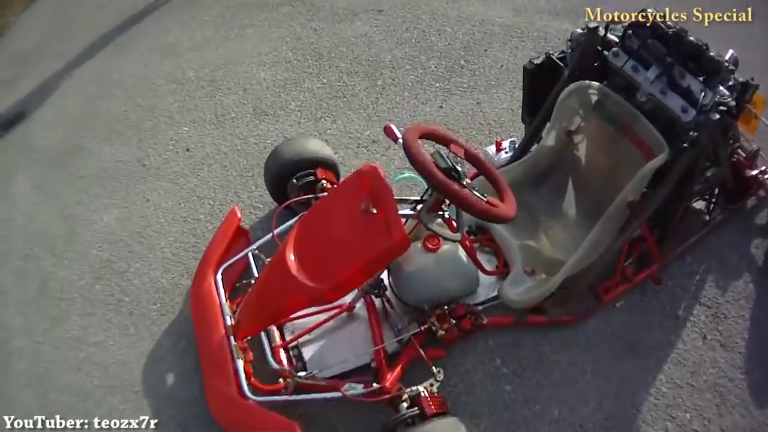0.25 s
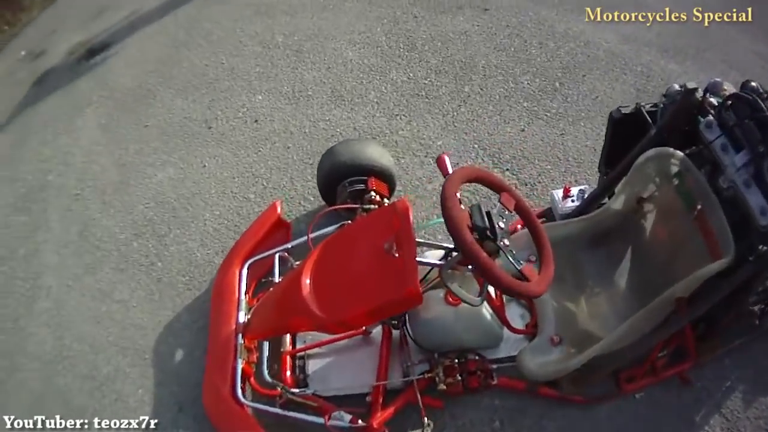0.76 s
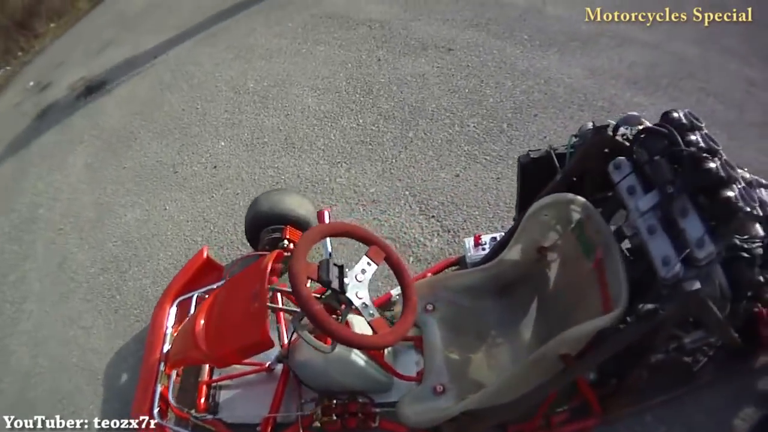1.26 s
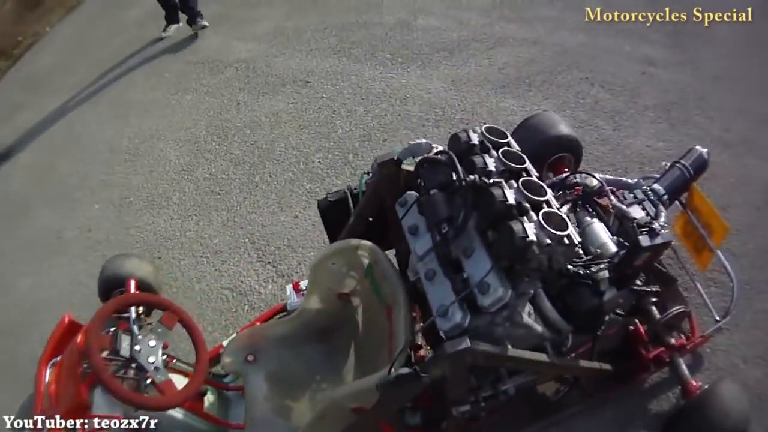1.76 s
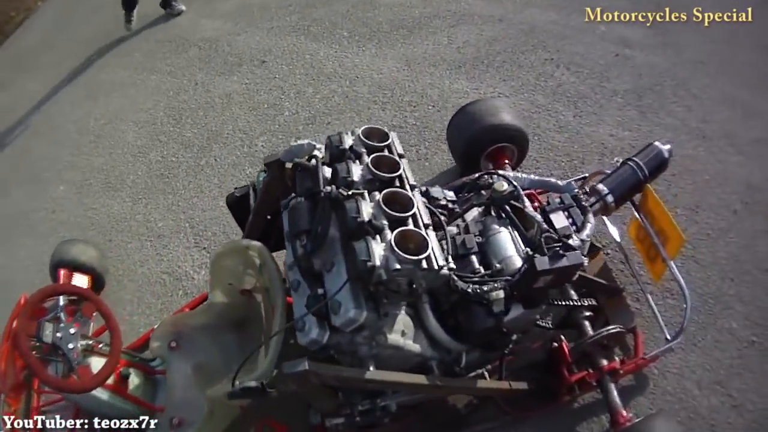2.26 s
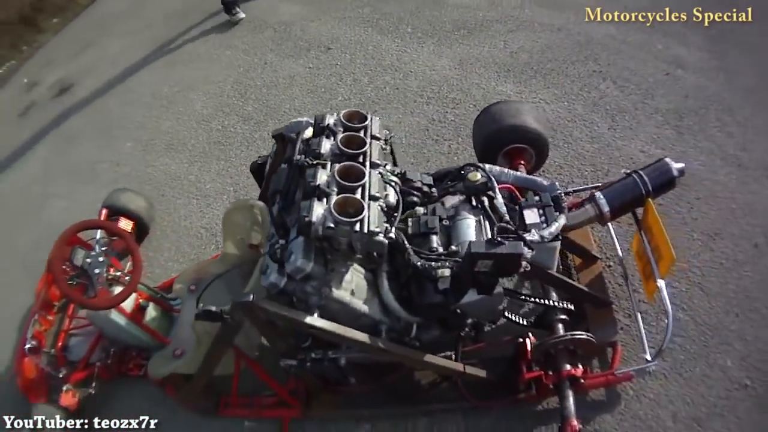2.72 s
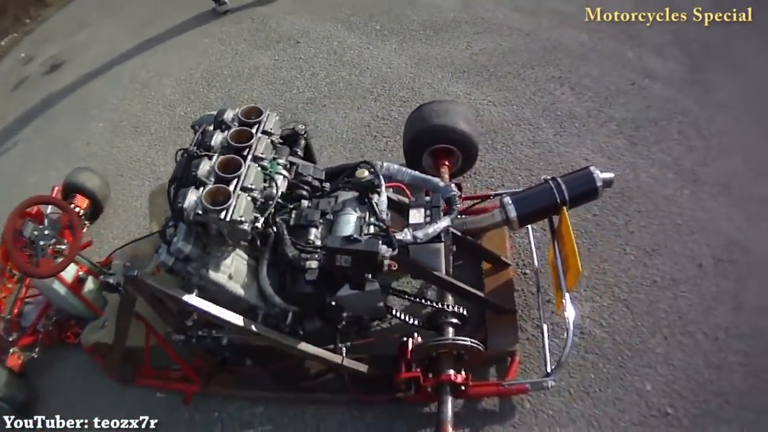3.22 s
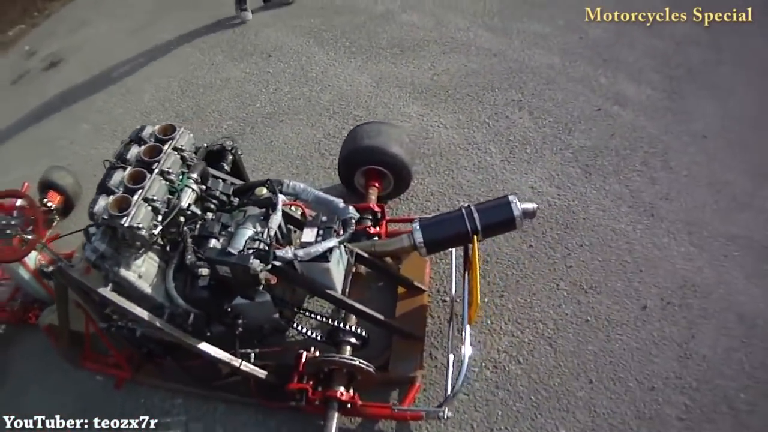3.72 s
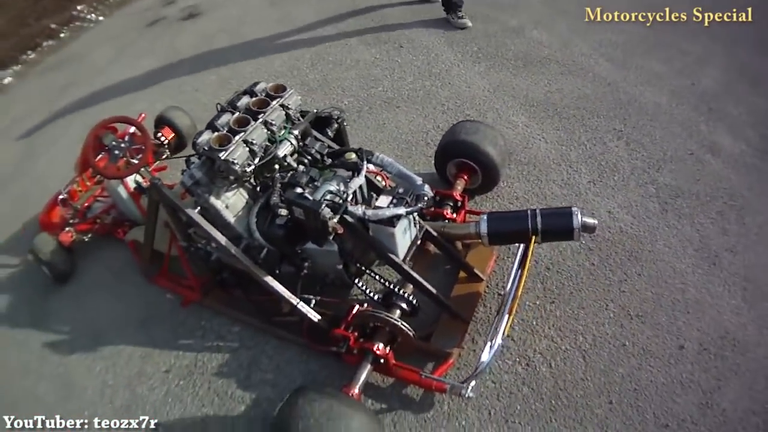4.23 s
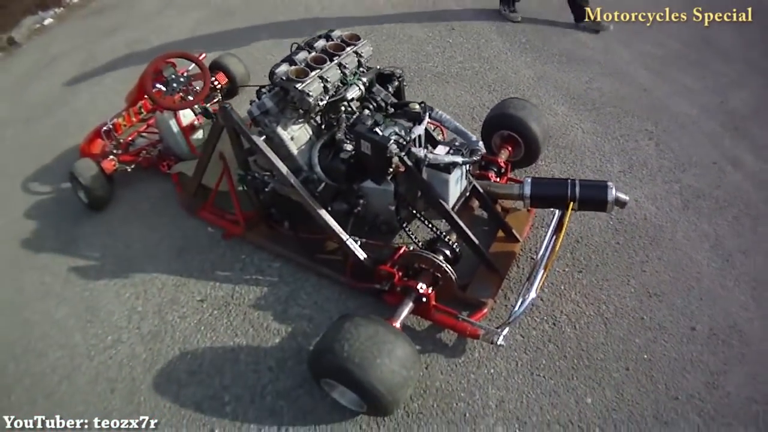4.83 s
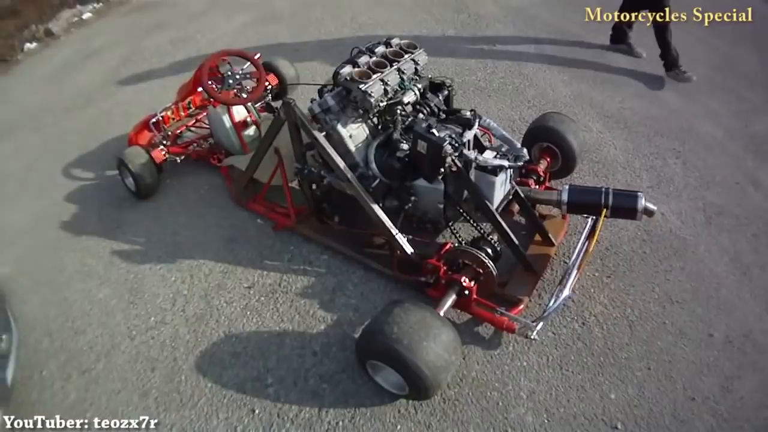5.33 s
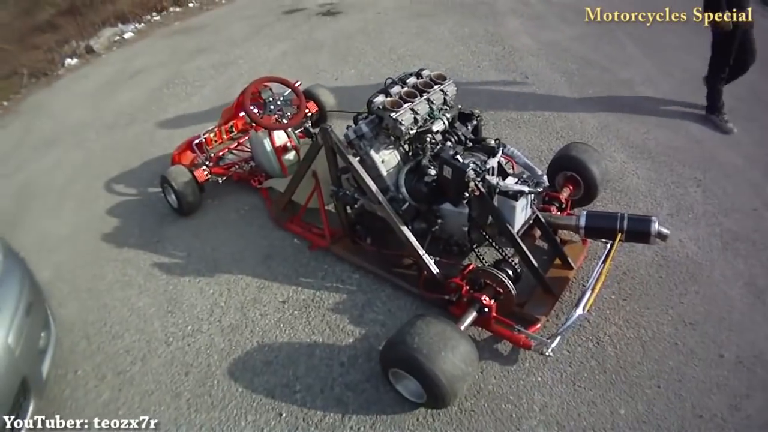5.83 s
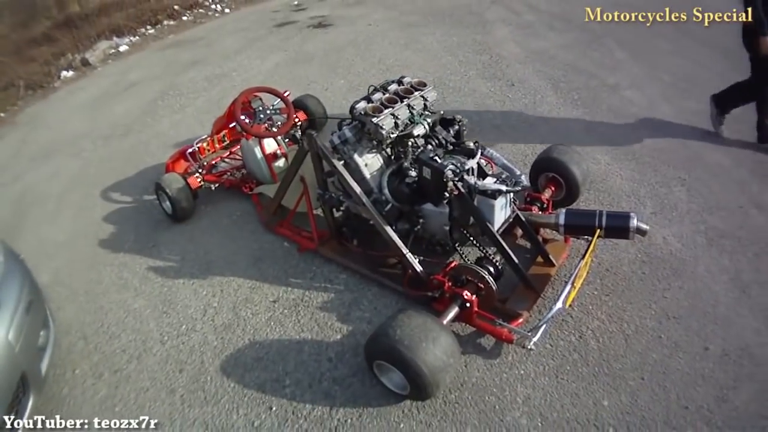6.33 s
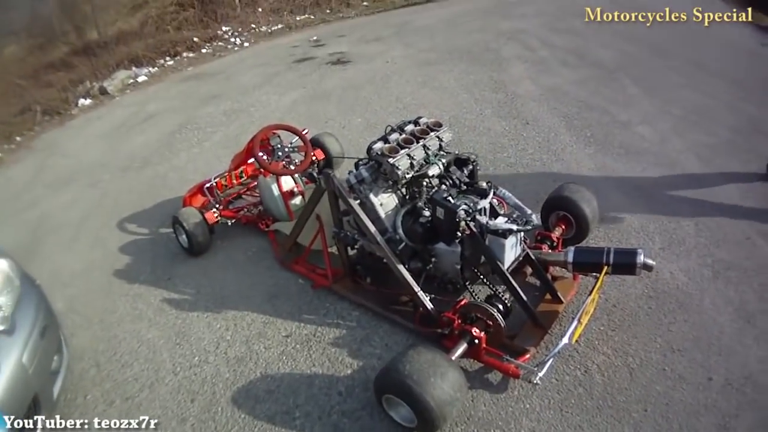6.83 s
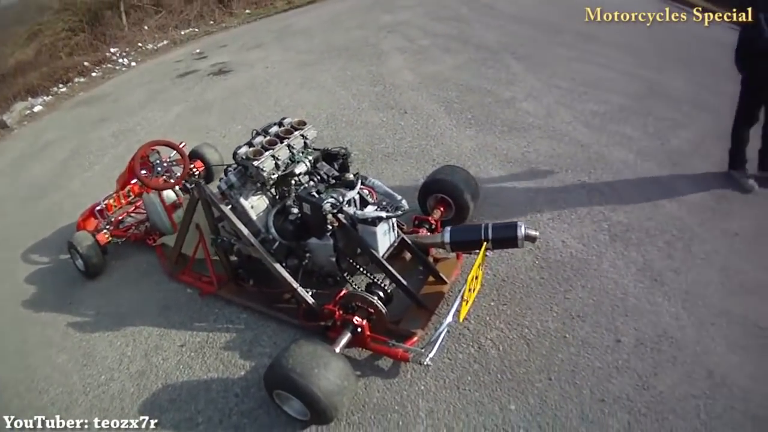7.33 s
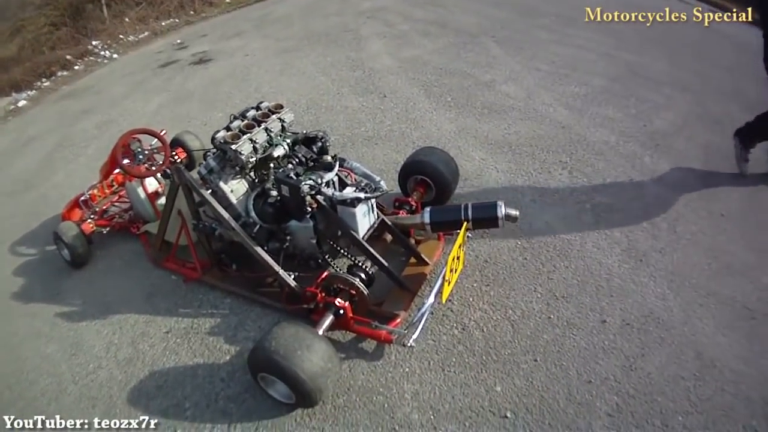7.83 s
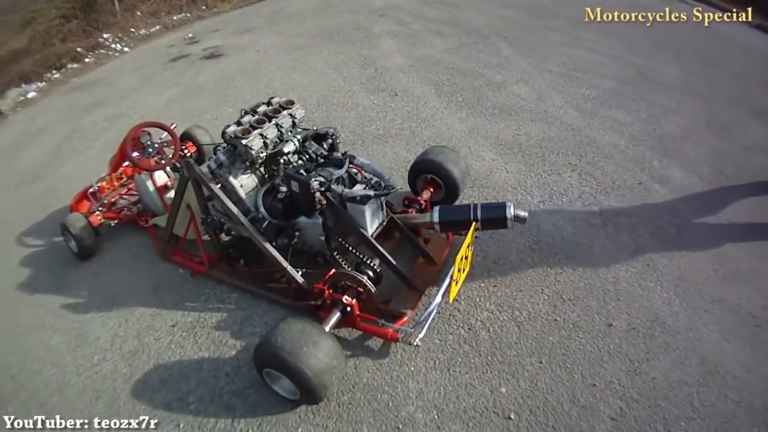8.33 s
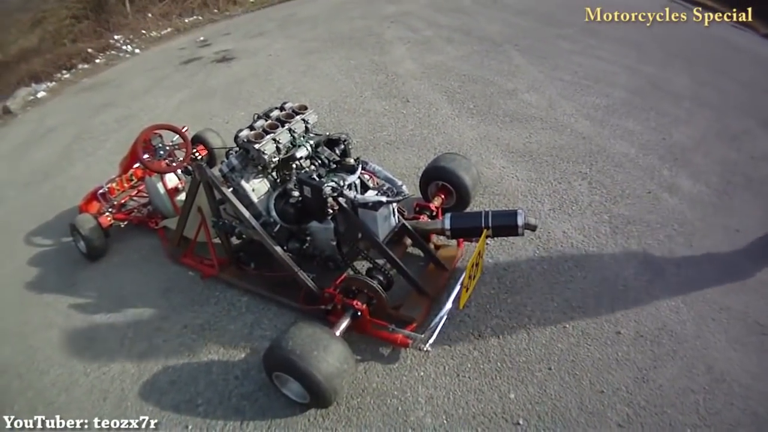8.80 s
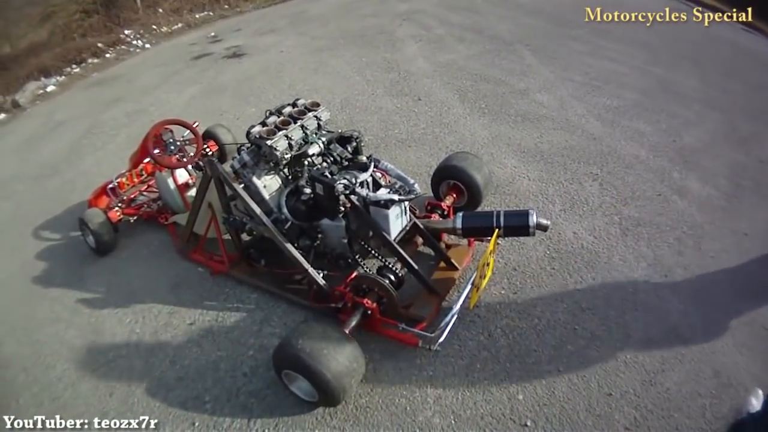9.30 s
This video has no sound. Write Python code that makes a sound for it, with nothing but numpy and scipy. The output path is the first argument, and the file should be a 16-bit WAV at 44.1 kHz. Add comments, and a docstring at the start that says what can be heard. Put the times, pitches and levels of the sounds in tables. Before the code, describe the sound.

A four-cylinder motorcycle engine in a go-kart idles outdoors, slightly uneven, with busy metallic clatter over a low exhaust throb.

```python
"""Idling go-kart, walk-round.

A four-cylinder motorcycle engine in a go-kart idles on open asphalt while the listener walks round it.
Each firing sends a pulse and a rush of gas through the silencer; one cylinder often fires weakly.
Chain, gears and valves clatter and ring the casings; the running gear squeals briefly.
The yard echoes faintly. A few knocks, shoe scuffs and one puff of wind pass over a steady outdoor wash."""
import sys
import numpy as np
from scipy import signal
from scipy.fft import rfft, irfft
from scipy.io import wavfile

SR = 44100
rng = np.random.default_rng(int(sys.argv[2]) if len(sys.argv) > 2 else 0)


def inscribe(sig):
    """Save sig as 16-bit PCM at rate SR to the path in sys.argv[1].

    A 1-D sig is mono; a 2-D sig holds one channel per row.
    Samples are clipped to [-1, 1] before scaling.
    """
    pcm = np.round(np.clip(np.atleast_2d(sig).T, -1, 1) * 32767)
    wavfile.write(sys.argv[1], SR, pcm.astype(np.int16))


N = 421596
TIME = np.arange(N) / SR
IDLE_HZ = 55.4  # nominal firing rate


def gain(db):
    """Decibels to amplitude."""
    return 10 ** (np.asarray(db) / 20)


def unit_rms(x):
    """Scale to rms 1."""
    return x / np.sqrt(np.mean(x ** 2) + 1e-20)


def curve(rows, column=1):
    """One column of a (t/s, values) table at every sample."""
    rows = np.array(rows)
    return np.interp(TIME, rows[:, 0], rows[:, column])


def drift(rate_hz):
    """Slow random drift, rms 1."""
    hz = np.fft.rfftfreq(N, 1 / SR)
    return unit_rms(irfft(rfft(rng.standard_normal(N)) * np.exp(-(hz / rate_hz) ** 2) * (hz > 0), N))


def colour(x, outline, size=8192):
    """Minimum-phase filter with an (f/Hz, gain/dB) outline."""
    hz, db = np.transpose(outline)
    bins_hz = abs(np.fft.fftfreq(size, 1 / SR))
    log_gain = np.log(gain(np.interp(np.log(bins_hz + 1), np.log(hz + 1), db)))
    impulse = np.fft.ifft(np.exp(np.conj(signal.hilbert(log_gain)))).real
    return signal.oaconvolve(x, impulse[:size // 2])[:N]


def resonate(x, hz, width_hz):
    """Two unity-gain resonators in series, at a steady or moving frequency."""
    carrier = np.exp(2j * np.pi * np.cumsum(hz * np.ones(N)) / SR)
    pole = np.exp(-np.pi * width_hz / SR)
    for _ in range(2):
        x = 2 * (carrier * signal.lfilter([1 - pole], [1, -pole], x / carrier)).real
    return x


def rattle(envelope, modes):
    """Tiny hits under an envelope ring a set of modes; rms 1."""
    hits = envelope * rng.standard_normal(N)
    return unit_rms(sum(gain(db) * resonate(hits, hz, width_hz) for hz, width_hz, db in modes))


def strokes(count, rise, decay, spread_db):
    """Envelope with a stroke of random size at each whole count; rise and decay in counts."""
    age = count % 1
    index = np.floor(count - np.floor(count.min())).astype(int)
    size = gain(spread_db * rng.uniform(-1, 1, index.max() + 1))
    return size[index] * (1 - np.exp(-age / rise)) * np.exp(-age / decay)


def swells(rows):
    """Short swells of band noise: linear rise, exponential decay."""
    octave = np.log2(np.fft.rfftfreq(N, 1 / SR) + 1)
    spectrum = rfft(rng.standard_normal(N))
    out = np.zeros(N)
    for start_s, db, hz, width_oct, rise_s, decay_s in rows:
        band = unit_rms(irfft(spectrum * np.exp(-.5 * ((octave - np.log2(hz)) / width_oct) ** 2), N))
        age_s = np.maximum(TIME - start_s, 0)
        envelope = np.minimum(age_s / rise_s, 1) * np.exp(-np.maximum(age_s - rise_s, 0) / decay_s)
        out += gain(db) * band * envelope
    return out


def walk(sounds, route):
    """Crossfade between standpoints along a (t/s, standpoint index) route."""
    place = curve(route)
    return sum(np.maximum(1 - abs(place - k), 0) * x for k, x in enumerate(sounds))


# Outdoor spectrum: f/Hz, relative level/dB
AIR_SPECTRUM = [(15, -13), (40, -47.5), (100, -27), (300, 3.5), (600, 11), (900, -6.5), (1300, -5),
                (1700, -10.5), (3000, -51), (14000, -23)]


def air(level_db=-53):
    """Steady outdoor wash."""
    return gain(level_db) * unit_rms(colour(rng.standard_normal(N), AIR_SPECTRUM))


# Wind puff, knocks, scuffs: t/s, top rms/dB, f/Hz, width/oct, rise/s, decay/s
BUMPS = [(.36, -34.5, 44.9, 2.2, 0.022, 0.022), (2.129, -41, 1175, .5, .001, .005),
         (2.498, -45, 1189, 0.62, .001, .004), (2.644, -37, 1147, .5, 0.0011, 0.0051),
         (4.88, -50, 1300, .6, 0.017, 0.047), (6.272, -56, 9260, .4, .002, 0.015),
         (7.01, -45.5, 1910, 1, 0.023, 0.074), (7.10, -31, 416, 0.31, 0.033, 0.029)]


def bumps():
    """A low puff of wind, sharp knocks and softer shoe scuffs."""
    return swells(BUMPS)


# Echo paths: first delay/s, last delay/s, gain/dB
ECHO_PATHS = [(0.0232, .0135, -22), (0.033, .029, -16.5), (.052, .0555, -34)]
# Echo trim, rising as the listener steps back: t/s, gain/dB
ECHO_TRIM = [(3.5, -5.5), (6.5, 2.5)]


def yard_echoes(x):
    """Reflections off a parked car and the yard's edge; the paths change as the listener walks."""
    echoes = sum(gain(db) * np.interp(TIME - np.linspace(first_s, last_s, N), TIME, x)
                 for first_s, last_s, db in ECHO_PATHS)
    return gain(curve(ECHO_TRIM)) * echoes


# Squeals: t/s, top rms/dB, f/Hz, width/oct, rise/s, decay/s
SQUEALS = [(1.33, -42, 3750, .03, 0.12, 0.077), (1.5, -42.5, 4070, .035, .06, .03),
           (3.58, -45, 4205, 0.016, 0.066, 0.073), (3.92, -40, 4030, .09, .08, .04)]


def squeals():
    """The running gear squeals briefly in narrow bands near 4 kHz."""
    return swells(SQUEALS)


# Hunting idle speed: t/s, firing rate/Hz
FIRING_RATE = [(0.0, 53.39), (0.511, 55.111), (0.837, 52.843), (1.06, 55.9), (2.062, 55.545),
               (2.189, 54.137), (3.14, 55.466), (3.208, 57.009), (3.644, 55.465), (4.338, 56.795),
               (4.452, 55.745), (5.148, 56.353), (5.49, 53.281), (5.846, 55.685), (6.256, 53.632),
               (7.796, 55.829), (7.898, 58.273), (8.32, 55.034), (8.452, 58.117), (8.848, 53.103),
               (9.046, 56.655), (9.56, 54.753)]


def crank():
    """Running count of firings, whole at each opening of an exhaust valve."""
    return np.cumsum(curve(FIRING_RATE)) / SR - .016


# Metal parts: f at idle/Hz, width/Hz, level/dB, speed tracking/0-1
RING_MODES = [(2413, 41, -5.5, .1), (2885, 45, -5.5, 1), (3560, 51, -7.5, .85)]
# Their carry to the listener: t/s, low/dB, middle/dB, high/dB
RING_LEVELS = [(0, -55, -51, -57), (.65, -60, -44.5, -39.5), (1.3, -50, -48, -40), (1.75, -42, -47, -46.5),
               (3.05, -43.5, -43.5, -36.5), (3.6, -55, -45.5, -53), (6.6, -49.5, -52.5, -41.5),
               (7.7, -58, -55, -52), (9.56, -57, -54, -54)]


def ringing(flicker_db=2.0, flicker_hz=5, flutter=0.0048, flutter_hz=7):
    """Meshing gears keep three parts ringing unevenly; the upper two follow the speed closely."""
    speed = curve(FIRING_RATE) / IDLE_HZ * (1 + flutter * drift(flutter_hz))
    out = np.zeros(N)
    for column, (hz, width_hz, db, tracking) in enumerate(RING_MODES, 1):
        tone = resonate(rng.standard_normal(N), hz * speed ** tracking, width_hz)
        tone *= gain(flicker_db * drift(flicker_hz))
        out += gain(curve(RING_LEVELS, column) + db) * unit_rms(tone)
    return out


# Machinery, loudest over the engine: t/s, gears and clatter and valves/dB, crankcase knock/dB
MACHINE_LEVELS = [(0, -42, -53.5), (2.5, -38.5, -54), (3.8, -39.5, -55), (7, -42.6, -60),
                  (9.56, -42.5, -63)]
# Tooth-mesh tones: f/firing rate, relative level/dB
MESH_ORDERS = [(18.5, -13), (20.5, -19), (39.5, -5), (43.25, -1.5), (52, -1.5), (56, -2.5), (64.5, 0),
               (68, -2), (72.5, -1.5), (76.5, -2.5)]


def gear_whine(level_db=-9, width_hz=22):
    """Meshing teeth give fuzzy whines locked to the engine speed."""
    firing_hz = curve(FIRING_RATE)
    whine = sum(gain(db) * unit_rms(resonate(rng.standard_normal(N), order * firing_hz, width_hz))
                for order, db in MESH_ORDERS)
    return gain(curve(MACHINE_LEVELS) + level_db) * unit_rms(whine)


# Two take-ups and a lighter rebound: phase/cycle, level/dB
BACKLASH_BLOWS = [(.9, 0), (.11, 0), (.48, -5)]


def backlash(firings, rise_cycles, decay_cycles, spread_db):
    """Envelope of the blows from the drive's slack in each cycle of four firings."""
    blows = [gain(db) * strokes(firings / 4 - phase, rise_cycles, decay_cycles, spread_db)
             for phase, db in BACKLASH_BLOWS]
    return np.sqrt(sum(blow ** 2 for blow in blows))


# Chain slap: t/s, level/dB
CHAIN_LEVEL = [(0, -58), (1.4, -54), (2, -49.5), (3.8, -47.5), (5, -50.5), (6.5, -51.5), (7.4, -53.5),
               (9.5, -56.5)]
# Chain tunnel: f/Hz, width/Hz, relative level/dB
TUNNEL_MODES = [(2180, 450, 0.5), (2330, 390, 1), (6320, 610, -11.5)]


def chain_slap(firings):
    """The cam chain slaps its guide at each backlash blow and rings the tunnel."""
    envelope = backlash(firings, rise_cycles=.04, decay_cycles=0.083, spread_db=5)
    return gain(curve(CHAIN_LEVEL)) * rattle(envelope, TUNNEL_MODES)


# Crankcase: f/Hz, width/Hz, relative level/dB
CRANKCASE_MODES = [(770, 220, -7), (1040, 35, 3), (1147, 63, 4), (1196, 165, 1)]


def crankcase_knock(firings, trim_db=-3):
    """Slack in the drive rattles the crankcase."""
    envelope = backlash(firings, rise_cycles=0.023, decay_cycles=0.17, spread_db=3)
    return gain(curve(MACHINE_LEVELS, column=2) + trim_db) * rattle(envelope, CRANKCASE_MODES)


# Casing response at the nose, overhead, at the side and further back: f/Hz, gain/dB
CASING_NOSE = [(900, -18.5), (1300, -13), (1900, -16.5), (2330, -19), (2600, -12), (3160, -9), (3650, -2.5),
               (4450, -15.5), (5200, -21), (6000, -20), (7000, -25), (8100, -23), (10000, -29.5),
               (14500, -35)]
CASING_OVER = [(760, -28.5), (1300, -11), (1500, -15.5), (2330, -0.5), (2610, -11), (2830, -0.5),
               (3130, -5.5), (3600, 4.5), (5340, -13.5), (6530, -12), (7300, -20), (8160, -14.5),
               (9980, -27), (11500, -19.5), (14500, -38)]
CASING_SIDE = [(760, -42.5), (1300, -16.5), (1760, -11), (2240, -0.5), (2610, -7.5), (2860, -3),
               (3530, 3.5), (3830, -3), (4360, -0.5), (4880, -19), (6340, -10.5), (7300, -18),
               (9780, -28.5), (13200, -24.5), (14500, -40)]
CASING_BACK = [(900, -34.5), (1650, -15.5), (2300, -0.5), (2680, -7.5), (3000, -3), (4000, 0.5),
               (5300, -20.5), (6650, -10), (7600, -26.5), (8300, -21), (9550, -23.5), (10300, -28.5),
               (11500, -22), (14500, -44)]


def casings(hits):
    """The casings colour small hits differently in each direction."""
    responses = (CASING_NOSE, CASING_OVER, CASING_SIDE, CASING_BACK)
    heard = [unit_rms(colour(hits, response)) for response in responses]
    return walk(heard, route=[(1.2, 0.33), (1.8, 1.47), (4, 1.34), (4.7, 2.5), (6.8, 2.27), (7.5, 2.97)])


# Bright valve tick: f/Hz, gain/dB
TICK_SPECTRUM = [(1500, -41), (4000, -11.5), (6000, 8.5), (14000, 3.5)]
# Tappets in firing order: level/dB
TAPPETS_DB = [-3.5, 1.5, -6.5, 1.5]


def valves(firings, trim_db=-16.5, lag_firings=0.73):
    """A valve snaps shut once a firing; looser tappets are louder. The seat screens them at the nose."""
    count = firings - lag_firings
    taps = strokes(count, rise=0.12, decay=0.33, spread_db=7.5)
    taps *= gain(TAPPETS_DB)[np.floor(count).astype(int) % 4]
    ticks = colour(taps * rng.standard_normal(N), TICK_SPECTRUM)
    seat_db = curve([(1, -6.5), (2, 0)])
    return gain(curve(MACHINE_LEVELS) + trim_db + seat_db) * casings(ticks)


def clatter(firings, trim_db=-2.5, grain_db=1.5, hits_per_s=6000, throb_depth=0.039):
    """Chain links and gear teeth: a dense rain of tiny hits, swelling slightly once a cycle."""
    size = gain(grain_db * np.minimum(rng.exponential(1, N), 3)) * rng.choice([-1, 1], N)
    struck = rng.random(N) < hits_per_s / SR
    throb = 1 + throb_depth * np.cos(2 * np.pi * (firings / 4 - .1))
    return gain(curve(MACHINE_LEVELS) + trim_db) * casings(size * struck * throb)


# Cylinders in firing order: level/dB
CYLINDERS_DB = [-0.31, 0.19, -0.39, -0.33]
# Runs of misfires: t/s, count, level re full firing/dB
MISFIRES = [(.134, 1, -39), (.647, 3, -6.5), (.965, 1, -13), (1.377, 1, -27), (1.593, 3, -15),
            (1.809, 6, -8.5), (2.756, 3, -10), (3.331, 5, -8.5), (4.046, 3, -23), (4.472, 2, -10),
            (4.901, 2, -7), (5.185, 2, -30), (5.627, 4, -17), (5.645, 1, -16), (6.285, 3, -10),
            (6.95, 4, -17), (7.603, 1, -25), (8.027, 2, -10), (8.115, 1, -14), (8.665, 2, -7),
            (9.102, 3, -6)]


def combustion(times_s, spread_db=0.63, lean_db=0.5, miss_every=8):
    """Gain of each firing. The fourth cylinder often runs lean; a stumbling one misses alternate cycles."""
    index = np.arange(len(times_s))
    scatter, lean = rng.standard_normal((len(times_s), 2)).T
    burn_db = np.array(CYLINDERS_DB)[index % 4] + spread_db * scatter
    burn_db -= lean_db * lean ** 2 * (index % 4 == 3)
    for start_s, count, db in MISFIRES:
        first = np.argmin(abs(times_s - start_s))
        burn_db[index[first::miss_every][:round(count)]] = db
    return gain(burn_db)


# Silencer response at the front, at the side and further back: f/idle firing rate, gain/dB
SILENCER_FRONT = [(1, -22), (2, -22.5), (3, -13.5), (4, -7.5), (5, 1.9), (6, -1.5), (7, -9.8), (8, -13.5),
                  (9, -17), (10, -37.5), (11, -65), (12, -46), (13, -41), (14, -53)]
SILENCER_SIDE = [(1, -5), (2, -3.5), (3, 0.5), (4, -2.5), (5, 6), (6, 0.5), (7, -2.5), (8, -15), (9, -9),
                 (10, -18), (11, -17), (12, -25.5), (13, -34), (14, -30.5)]
SILENCER_BACK = [(1, -4), (2, -1), (3, 2.5), (4, -4), (5, 0), (6, -5.5), (7, -2), (8, -14), (9, -19.5),
                 (10, -19.5), (11, -20.5), (12, -28), (13, -38), (14, -32.5)]


def silencer(pulses, gas):
    """Passes the low firing harmonics and cuts the treble; the gas is loudest towards the open end."""
    standpoints = [(SILENCER_FRONT, -39.5, -10.2), (SILENCER_SIDE, -36, -8.8), (SILENCER_BACK, -35, -8.8)]
    heard = []
    for harmonics, gas_db, trim_db in standpoints:
        passband = [(order * IDLE_HZ, db) for order, db in harmonics]
        response = [(2, -91), (25, -37)] + passband + [(950, -58), (2000, -71.5)]
        heard.append(gain(trim_db) * unit_rms(colour(pulses + gain(gas_db) * gas, response)))
    return walk(heard, route=[(3.5, 0.36), (4.6, 1.01), (5.2, 1.08), (6.1, 1.18), (7.4, 1.89)])


# Gas rush in the pipe: f/Hz, gain/dB
GAS_SPECTRUM = [(50, -10), (180, -12), (330, 2.5), (600, 6), (800, 16)]
# Silencer's upper mode, heard best from certain angles: low edge/Hz, high edge/Hz
BARK_BAND_HZ = [476, 605]
# Exhaust at the listener: t/s, gain/dB, extra boom/dB, extra bark/dB
EXHAUST_LEVELS = [(0, -18.5, 2.5, -13), (.85, -15.5, -1.8, -7.5), (1.85, -14.5, -0.2, 6),
                  (2.5, -14, -1.3, -2), (3.2, -14, 0.5, -1), (4.15, -18, 1, -5), (4.85, -22.5, 2.5, 7),
                  (5.9, -23, 0.5, -2.5), (6.35, -26, 3.5, 2.5), (6.8, -23, 0, 1), (7.95, -22.5, -1.5, -6.5),
                  (8.8, -25.5, 2, 7.5), (9.56, -25, 0.5, 5.5)]


def exhaust(firings, gas_decay_firings=0.58, puff_db=-9, jitter_s=0.00016, boom_hz=195):
    """Each firing sends a pressure pulse and a short rush of gas down the pipe."""
    onsets = np.flatnonzero(np.diff(np.floor(firings)))
    strength = combustion(onsets / SR)
    jitter = np.round(jitter_s * SR * rng.standard_normal(len(onsets))).astype(int)
    onsets = np.clip(onsets + jitter, 0, N - 1)
    pulses, unburnt = np.zeros((2, N))
    pulses[onsets], unburnt[onsets] = strength, 1 - strength
    # a bad burn still pumps out a soft puff
    puffs = gain(puff_db) * colour(unburnt, [(150, -9.5), (400, -7.5), (1000, -37)])
    gas_envelope = signal.lfilter([1], [1, -np.exp(-IDLE_HZ / gas_decay_firings / SR)], pulses)
    gas = colour(gas_envelope * rng.standard_normal(N), GAS_SPECTRUM)
    beat = silencer(pulses + puffs, gas)
    boom = signal.sosfiltfilt(signal.butter(5, boom_hz, fs=SR, output="sos"), beat)
    bark = signal.sosfiltfilt(signal.butter(2, BARK_BAND_HZ, "band", fs=SR, output="sos"), beat)
    level, boom_gain, bark_gain = (gain(curve(EXHAUST_LEVELS, column)) for column in (1, 2, 3))
    return level * (beat + (boom_gain - 1) * boom + (bark_gain - 1) * bark)


def scene():
    """Machinery and exhaust on one crank, with the yard around them; mono."""
    firings = crank()
    engine = clatter(firings) + valves(firings) + crankcase_knock(firings) + chain_slap(firings)
    engine += gear_whine() + ringing() + exhaust(firings)
    return (engine + yard_echoes(engine) + bumps() + squeals() + air())[None]


def record(dry, cutoff_hz=14100):
    """Steep linear-phase low-pass."""
    taps = signal.firwin(255, cutoff_hz, window=("kaiser", 9), fs=SR)
    return signal.oaconvolve(dry, taps[None], "same")


dry = scene()
out = record(dry)
inscribe(out)
```